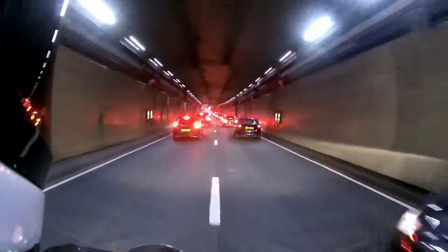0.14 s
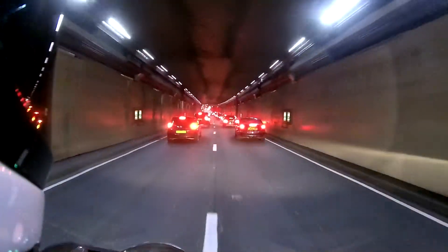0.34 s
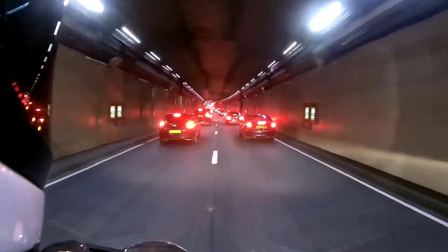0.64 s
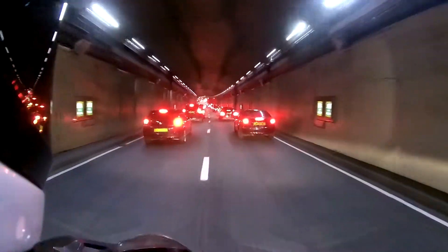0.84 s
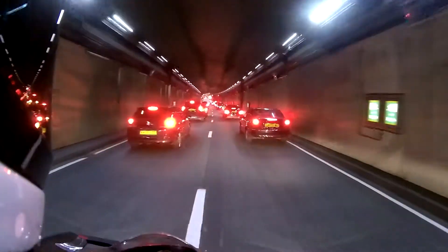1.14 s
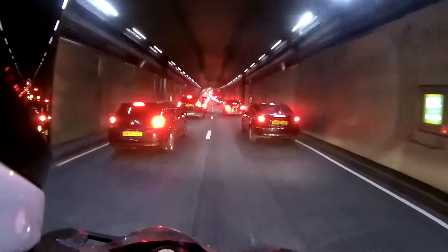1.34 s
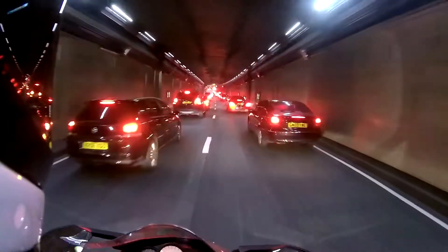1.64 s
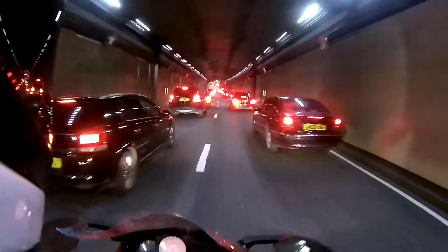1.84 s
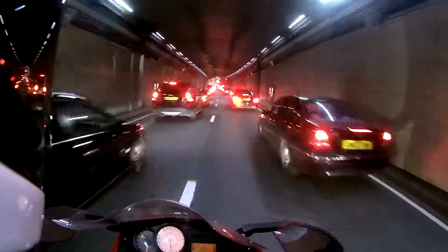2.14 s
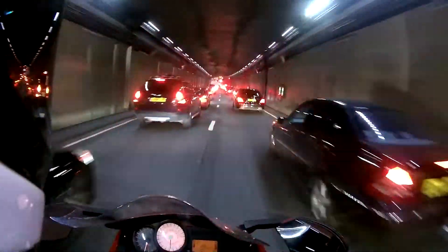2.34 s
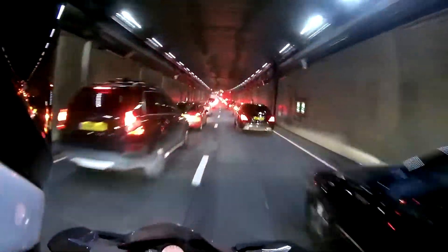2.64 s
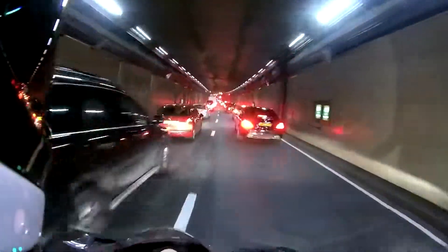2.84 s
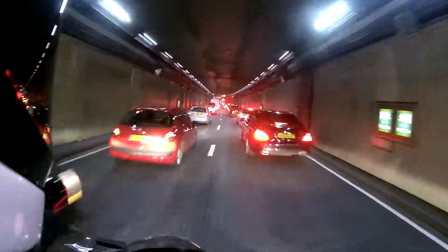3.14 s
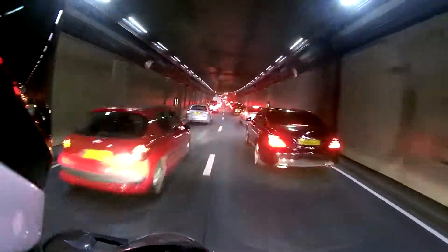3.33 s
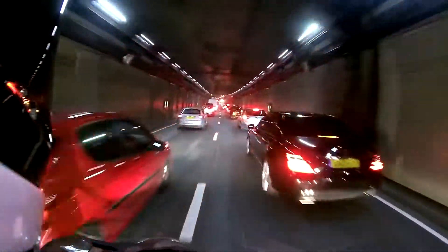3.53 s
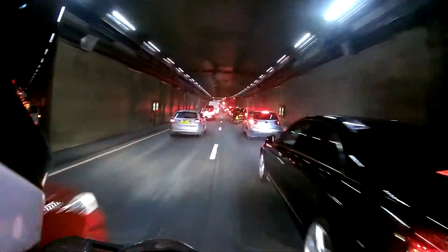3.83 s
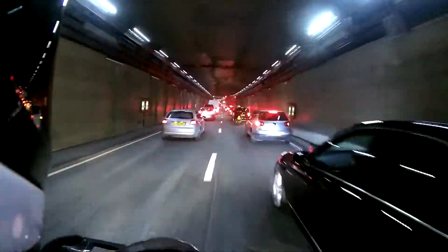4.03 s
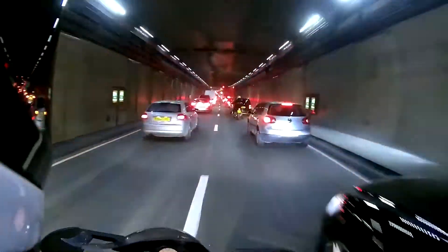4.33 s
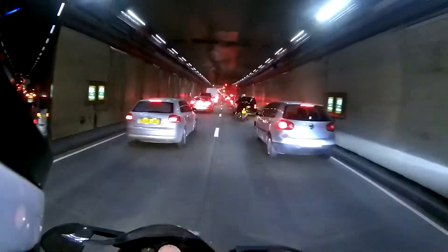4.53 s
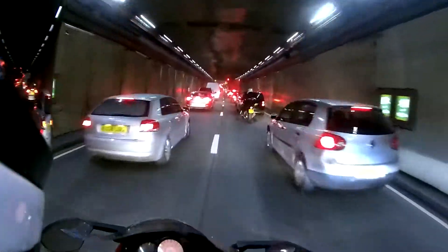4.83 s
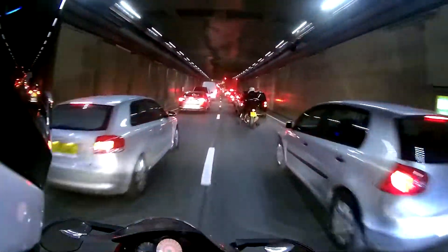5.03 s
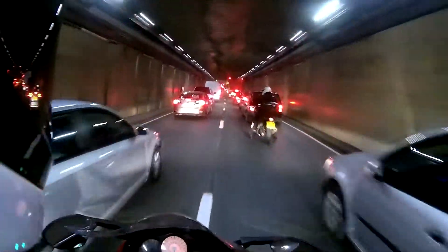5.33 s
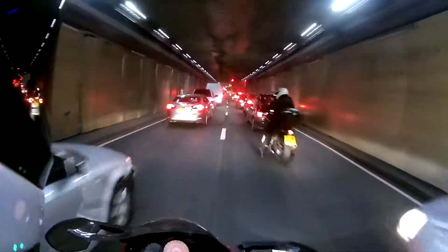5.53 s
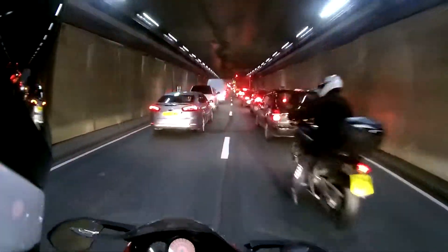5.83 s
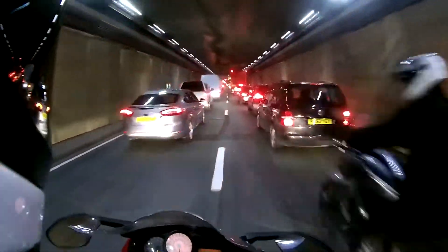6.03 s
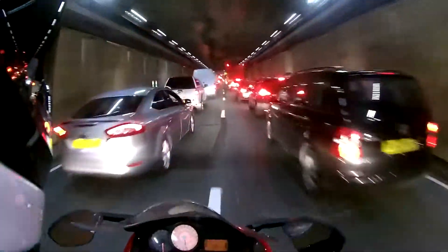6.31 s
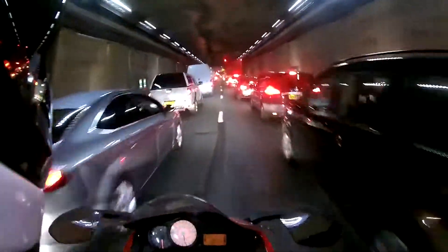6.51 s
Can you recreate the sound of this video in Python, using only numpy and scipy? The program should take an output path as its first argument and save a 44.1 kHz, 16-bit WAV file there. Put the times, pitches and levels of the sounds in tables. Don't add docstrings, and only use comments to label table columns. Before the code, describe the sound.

Motorcycle engine note sinks, climbs briefly, crackles with soft exhaust pops and falls away through tunnel echo, with tyre roar, wind buffets and faint brake squeal.

```python
import sys
import numpy as np
from scipy import signal
from scipy.fft import rfft, irfft, next_fast_len
from scipy.io import wavfile
from scipy.ndimage import uniform_filter1d

SR = 44100
rng = np.random.default_rng(int(sys.argv[2]) if len(sys.argv) > 2 else 0)


def waveform_to_disk(signal):
    frames = np.transpose(np.atleast_2d(signal))
    scaled = np.clip(frames, -1, 1) * 32767
    samples = np.round(scaled).astype(np.int16)
    wavfile.write(sys.argv[1], SR, samples)


def ratio_of_db(decibels):
    return 10 ** (np.asarray(decibels, float) / 20)


N = 294147
TIME_S = np.arange(N) / SR


def rms_one(x):
    return x / np.sqrt(np.mean(x ** 2) + 1e-20)


def in_time(rows):
    s, *columns = np.transpose(rows)
    return [np.interp(TIME_S, s, column) for column in columns]


def cycles_to_phase(hz):
    return 2 * np.pi * np.cumsum(hz) / SR


def drift(rate_hz):
    r = np.exp(-80 * np.pi * rate_hz / SR)
    white = rng.standard_normal(N // 40 + 2002)
    slow = signal.lfilter([1], [1, -2 * r, r * r], white)[2000:]
    return np.interp(np.arange(N) / 40, np.arange(len(slow)), rms_one(slow - slow.mean()))


def swells(rows):
    s, length_s, *lifts = np.transpose(rows)
    coarse = np.arange(0, N, 40)
    bells = np.exp(-np.abs(2 * (coarse[:, None] / SR - s) / length_s) ** 2)
    return [np.interp(np.arange(N), coarse, bells @ lift) for lift in lifts]


def resonate(x, hz, width_hz):
    r = np.exp(-np.pi * width_hz / SR)
    poles = [1, -2 * r * np.cos(2 * np.pi * hz / SR), r * r]
    return signal.lfilter(np.array([1, 0, -1]) * (1 - r * r) / 2, poles, x)


def coloured(spectrum, patchy_db):
    hz, level_db = np.transpose(spectrum)
    edges = 20 * 2 ** np.arange(0, 10.1, .5)
    white = rng.standard_normal((2, N))
    patches = np.zeros(N)
    for k in range(len(edges) - 1):
        band = signal.butter(2, edges[k:k + 2], "band", fs=SR, output="sos")
        patches += ratio_of_db(patchy_db * drift(10.0)) * signal.sosfilt(band, white[k % 2])
    size = next_fast_len(N)
    grid_hz = np.arange(size // 2 + 1) * SR / size + 1
    shape = ratio_of_db(np.interp(np.log(grid_hz), np.log(hz), level_db, left=-80, right=-80))
    return rms_one(irfft(rfft(patches, size) * shape, size)[:N])


def circuit_tone():
    return np.sqrt(2) * ratio_of_db(-102) * np.sin(2 * np.pi * 9625 * TIME_S)


# (time [s], length [s], lift [dB])
GUSTS = [(0, .1, 15), (.92, 0.1, 4), (1.33, 0.16, 3.5), (1.72, .14, 17), (2.88, 0.5, 14.5), (3.44, .1, 7),
         (3.77, 0.089, 8), (4.16, 0.14, 9), (4.62, .12, 8), (4.88, 0.12, 10), (5.18, 0.068, 20),
         (5.44, .1, 11), (5.6, .08, 11), (5.9, 0.47, 7), (6.28, 0.078, 10), (6.47, .14, 6)]


def wind():
    band = signal.butter(3, [28, 68], "band", fs=SR, output="sos")
    rumble = signal.sosfilt(band, rng.standard_normal(N))
    return ratio_of_db(-56.5 + swells(GUSTS)[0] - 2 * drift(4.0)) * rms_one(rumble)


# (frequency [Hz], density [dB per Hz])
ROAR = [(60, -43), (100, 1.5), (160, -10), (300, -9.5), (500, -12.5), (1000, -16.5), (1900, -19.5),
        (2300, -28), (3300, -38.5), (4400, -49.5), (5200, -46.5), (7000, -61), (9000, -71.5),
        (12800, -68.5)]
# (frequency [Hz], density [dB per Hz])
HISS = [(1500, -22.5), (2500, 13), (3300, -3.5), (4400, -1), (5200, 1.5), (6500, -9), (7200, -13.5),
        (9000, -19), (10300, -18.5), (12800, -33)]
# (time [s], length [s], roar lift [dB], hiss lift [dB])
PASSES = [(.1, .4, 2.5, 8), (2.36, .42, 7, 5), (2.79, .3, 3, 7), (3.99, .14, 3, 6), (4.2, .1, 1, 4),
          (4.36, .38, 3, 6), (5.44, .14, 1, 5), (5.61, .1, 3, 3), (3.12, .1, 2, 1), (4.75, .3, 1, 1),
          (5.81, .08, 0.1, 3), (6.1, .14, 3, 2), (6.24, .12, 0, 4), (6.55, .1, 1, 3)]
# (time [s], peak [dB])
TICK = [
    (2.7194, -48.5),
    (6.23, -52.5),
]


def traffic():
    faster_hz = in_time(ENGINE)[0] - 105
    roar_lift_db, hiss_lift_db = swells(PASSES)
    roar = ratio_of_db(-40 + 0.0872 * faster_hz + roar_lift_db) * coloured(ROAR, patchy_db=0.9)
    clicks = np.full(N, 1e-18)
    for s, peak_db in TICK:
        clicks[round(s * SR)] = ratio_of_db(peak_db)
    flick = np.convolve(clicks, ratio_of_db(-5) * np.hanning(500), "same")
    hiss_level = ratio_of_db(-65 + 0.0172 * faster_hz + hiss_lift_db) + flick
    return roar + hiss_level * coloured(HISS, patchy_db=0.6)


# (frequency [Hz], level [dB])
SQUEAL = [
    (6130, -73),
    (6330, -78.5),
]
# (time [s], level [dB])
SQUEAL_SWELL = [
    (5.8, -18),
    (6.05, -12),
    (6.15, -3),
    (6.45, -1.5),
    (6.67, -3),
]


def brakes():
    width_hz = 90
    lines = np.zeros(N)
    for hz, level_db in SQUEAL:
        once = resonate(rng.standard_normal(N), hz, width_hz)
        lines += ratio_of_db(level_db) * rms_one(resonate(once, hz, width_hz))
    return ratio_of_db(in_time(SQUEAL_SWELL)[0]) * lines


# (time [s], level [dB])
GEAR = [
    (2.1, -95),
    (2.35, -76),
    (2.6, -75),
    (2.9, -81),
    (3.1, -76.5),
    (3.6, -75.5),
    (4.15, -75),
    (4.4, -90),
]


def gear_whine():
    broken = ratio_of_db(3.5 * drift(12))
    phase = cycles_to_phase(5000 - 385 * TIME_S) + 1.5 * drift(30)
    return np.sqrt(2) * ratio_of_db(in_time(GEAR)[0]) * broken * np.sin(phase)


# (time [s], peak [dB], ring [Hz])
POPS = [
    (2.643, -14.5, 391),
    (2.711, -16.5, 259),
    (2.804, -17.5, 266),
    (2.844, -12.5, 281),
    (2.939, -17.5, 266),
]


def afterfire():
    out = np.zeros(N)
    t = np.arange(int(.05 * SR)) / SR
    swell = t / 0.0063 * np.exp(1 - t / 0.0055)
    for s, peak_db, hz in POPS:
        at = round(s * SR)
        out[at:at + len(t)] -= ratio_of_db(peak_db - 3.0) * swell * np.sin(2 * np.pi * hz * t)
    return out


# (frequency [Hz], density [dB per Hz])
RASP = [(60, -14), (130, 4), (300, 9), (500, 5), (800, -2.5), (1500, -23), (2500, -29), (4000, -48),
        (7000, -51)]


def combustion_rasp(turn, rasp_db):
    puffs = 1 + .5 * np.cos(turn)
    return ratio_of_db(rasp_db) * puffs * coloured(RASP, patchy_db=3.5)


# (multiple of firing rate, level against the effort [dB])
UPPER_ORDERS = [(6, -8.5), (7, -15), (8, -16.5), (9, -14.5), (10, -15.5), (11, -14.5), (12, -15)]
# (time [s], length [s], multiple, lift [dB])
UPPER_SWELLS = [(0.247, .3, 8, 13), (.3, .15, 7, 6), (.52, .25, 9, 7), (.7, 0.49, 11, 6.5),
                (0.853, .35, 9, 10.5), (0.849, 0.25, 8, 6.5), (1.0, .25, 7, 7.5), (1.443, 0.33, 7, 10),
                (2.082, 0.16, 7, 13.5), (2.35, .2, 6, 6.5), (3.801, 0.28, 6, 6.5), (4.3, .25, 8, 3),
                (4.42, 0.53, 6, 5), (4.505, .4, 10, 8.5), (5.049, .35, 7, 10)]


def upper_orders(firing_hz, effort_db):
    crank = cycles_to_phase(uniform_filter1d(firing_hz, size=SR // 5))
    common_db = -48 + .6 * (effort_db - effort_db.mean())
    tone = np.zeros(N)
    for k, order_db in UPPER_ORDERS:
        own_swells = [(s, length_s, lift_db * (round(order) == round(k)))
                      for s, length_s, order, lift_db in UPPER_SWELLS]
        level_db = swells(own_swells)[0] + common_db + order_db + 2.0 * drift(4.3)
        tone += ratio_of_db(level_db) * np.sin(round(k) * crank + 0.66 * drift(6.7))
    return np.sqrt(2) * tone


def echo_beat(nulls):
    s, depth_db, lift_db = np.transpose(nulls)
    t = np.arange(0, N, 20) / SR
    end_s = max(s[-1] + .5, 2 * N / SR - s[-1] - .5)
    slip = np.interp(t, np.r_[s[0] - .5, s, end_s], np.arange(len(s) + 2))
    crest = ratio_of_db(np.interp(slip - .5, np.arange(len(s) + 1), np.r_[0, lift_db]))
    floor = ratio_of_db(np.minimum(np.interp(t, s, depth_db), 0))
    beat = crest * np.hypot(np.sin(np.pi * slip), floor * np.cos(np.pi * slip))
    return np.interp(TIME_S, t, beat)


# (multiple of firing rate, level at the crest [dB], share following effort, not exhaust [0-1])
LOW_ORDERS = [
    (1, 1, 0.051),
    (2, -5, 0.13),
    (3, 4, 0.91),
    (4, 3, 0.94),
    (5, -3, 0.84),
]
# (frequency [Hz], gain [dB])
PIPE = [(95, 0.5), (190, -2.5), (240, -1), (285, -3), (335, 4.5), (400, 0), (460, -3), (560, -2.5)]
# (time [s], depth [dB], lift of the swell that follows [dB])
NULLS_1 = [(.11, -18.5, -2.5), (.29, -3.5, -5), (.53, 0.5, -2.5), (.78, -8, 1.6), (1.02, -7.5, 0.9),
           (1.2, -16.5, -8.5), (1.3, -23.5, -2), (1.49, -10.5, 3.5), (1.68, -19, 1.5), (1.91, -25.5, -1.5),
           (2.15, -1, 2), (2.35, -10, 0.7), (2.54, -10.5, -5), (2.62, -20, -1), (2.73, -21, 1.3),
           (2.84, -18, -1.5), (2.99, -5.5, 3.5), (3.14, -9.5, 4.5), (3.32, -4.5, 1), (3.46, -3.5, -3),
           (3.65, -8.5, 2), (3.9, -3, -0.5), (4.07, -19, -4), (4.16, -1, 0.3), (4.83, -5, -0.1),
           (5.11, -5, -8.5), (5.35, -7, 1.5), (5.54, -7, 0.3), (5.71, -4, 0), (5.84, -2.5, -2)]
NULLS_2 = [(-.05, -9, 5), (.19, -14, -7), (.44, -18, 2.5), (.7, -4, -0.5), (1.08, -3.5, -5),
           (1.359, -12.5, -6.5), (1.45, -22, -8.5), (1.56, -26.5, 6.5), (1.74, -12, 2.5),
           (1.83, -29.5, 4.5), (2.17, -15, -1.8), (2.32, -20.5, 2.5), (2.4, -9, 6), (2.53, -20, -15.5),
           (2.61, -13, 2), (3.0, -14.5, 3), (3.15, -4.5, 5.5), (3.321, -11, -8), (3.44, -25, -7),
           (3.529, -0.5, 4), (3.731, -4.5, 2), (3.89, -7.5, 0.2), (4.2, -17.5, 3), (4.65, -7.5, -1),
           (4.88, -2.5, -4.5), (5.27, -8, 3.5), (5.65, -2, -3), (6.08, -19, -5), (6.37, -25, -1),
           (6.58, -9, 4)]
NULLS_3 = [(-.04, -8, 4), (.16, -7, -4), (.44, 0.5, 0), (1.02, -7.5, -2.5), (1.33, -10, -1),
           (1.76, -11.5, 9.5), (1.89, -18, -1.5), (1.99, -12.5, 8), (2.21, 3, 5), (2.27, -17, -1.5),
           (2.41, 1, 1.5), (2.64, -18, 5.7), (3.08, -10, 4), (3.6, -3, -1), (4.16, -9.5, 1),
           (4.42, -13, -7), (4.55, -19, -3), (4.64, -18, -6.5), (5.05, -17, -3), (5.41, 8, 4.5),
           (5.87, 0, 2), (6.18, -15, -17)]
NULLS_4 = [(.03, -20, -4), (.11, -19, -4.5), (.2, -9, -1), (.5, -26, -0.5), (.87, -2.5, -1),
           (1.39, -14, -12), (1.67, -18, 7.5), (1.91, -2, 3.5), (2.12, -10, 11.5), (2.27, -20.5, 3.5),
           (2.39, -20, -6.5), (2.7, -16.5, -14), (3.05, -11, -0.5), (3.32, -12.5, -2.5), (3.75, -3.5, -2.5),
           (4.38, -13.5, -0.5), (4.61, -10, -9.7), (5.2, 7, -5), (5.42, -14, -0.5), (5.92, 5, 3),
           (6.218, -25, 3.5)]
NULLS_5 = [(.1, -13, -3), (.6, -8, -5), (1.059, -13.5, 3.5), (1.72, -9.5, 6.5), (1.99, -24.5, 9),
           (2.13, -11, -0.5), (2.27, -0.5, -1.8), (2.4, -2, 6), (2.72, -16.5, 2.5), (3.3, -9.5, -3),
           (3.7, -3, -3.5), (4.2, -12.5, -6.5), (4.42, -22, -1), (4.62, -10, -4.5), (4.98, -18, -1),
           (5.429, -15, 4), (5.75, -15, 7.5), (6.22, -8, 11)]


def low_orders(turn, firing_hz, crest_db, effort_db):
    tone = np.zeros(N)
    all_nulls = (NULLS_1, NULLS_2, NULLS_3, NULLS_4, NULLS_5)
    for index, ((k, order_db, share), nulls) in enumerate(zip(LOW_ORDERS, all_nulls)):
        pipe_db = np.interp(k * firing_hz, *np.transpose(PIPE))
        level_db = order_db + crest_db + share * (effort_db - crest_db) + pipe_db
        flutter_db = .4 * index * drift(9.7)
        wander = .24 * np.sqrt(index + 1) * drift(8.6)
        tone += echo_beat(nulls) * ratio_of_db(level_db + flutter_db) * np.sin((index + 1) * turn + wander)
    return np.sqrt(2) * tone


# (time [s], firing rate [Hz], exhaust crest [dB], effort [dB], combustion rasp [dB])
ENGINE = [(0, 119.9, -20.5, -48.5, -51), (.5, 112.1, -22.5, -46, -49), (1, 106.2, -25, -47, -42.5),
          (1.5, 98.84, -18, -51, -42.5), (1.7, 96.3, -36, -54, -45.5), (1.8, 102.3, -32, -52, -48.5),
          (1.95, 100.8, -30, -40.5, -38.5), (2.17, 111.8, -21.5, -40.5, -34.5),
          (2.45, 133.8, -19.5, -33.5, -30), (2.62, 133.5, -18, -42, -45), (2.85, 134.3, -23, -51, -32.5),
          (3.08, 128.9, -25, -58, -44.5), (3.42, 127.8, -21.5, -50, -42.5), (4.2, 114.6, -25, -44, -61.5),
          (5.02, 103.5, -25, -42.5, -50), (5.14, 100.8, -27.5, -47.5, -43), (5.8, 95.43, -36, -56.5, -58),
          (6.67, 93.24, -35, -55, -75)]


def exhaust():
    firing_hz, crest_db, effort_db, rasp_db = in_time(ENGINE)
    turn = cycles_to_phase(firing_hz) - np.pi / 2
    tone = low_orders(turn, firing_hz, crest_db, effort_db) + upper_orders(firing_hz, effort_db)
    return tone + combustion_rasp(turn, rasp_db)


def tunnel(x):
    t60_s = 1.8
    t = np.arange(SR) / SR
    tail = rng.standard_normal(SR) * ratio_of_db(-60 * t / t60_s) * (t > .02)
    tail /= np.sqrt(np.sum(tail ** 2))
    tail = signal.sosfilt(signal.butter(2, 170.0, "high", fs=SR, output="sos"), tail)
    eased = x * np.minimum(np.arange(N) / 900, 1)
    return ratio_of_db(-6) * signal.fftconvolve(eased, tail)[:N]


def scene():
    surroundings = circuit_tone() + wind() + traffic() + brakes()
    engine = gear_whine() + afterfire() + exhaust()
    return (surroundings + engine + tunnel(engine))[None]


def roll_off(x):
    return signal.sosfilt(signal.butter(12, 12780, fs=SR, output="sos"), x)


# (frequency [Hz], width [Hz], lift [dB])
HELMET = [(1613, 43, 5), (2800, 220, 2.5), (3590, 380, 4), (4114, 640, 9.5), (5060, 670, -2),
          (8000, 710, 5.5), (10200, 900, 1.5)]


def record(dry):
    for hz, width_hz, lift_db in HELMET:
        dry = dry + (ratio_of_db(lift_db) - 1) * resonate(dry, hz, width_hz)
    return roll_off(dry)


dry = scene()
out = record(dry)
waveform_to_disk(out)
```